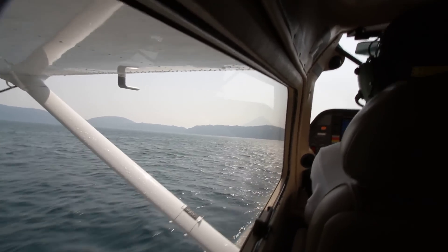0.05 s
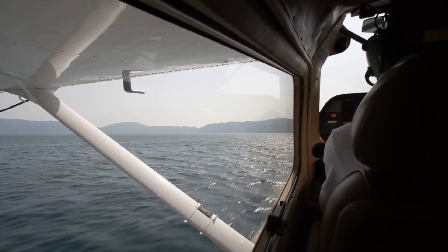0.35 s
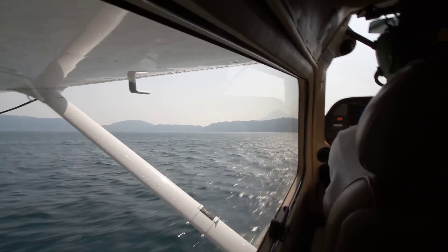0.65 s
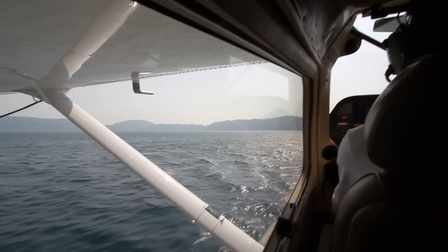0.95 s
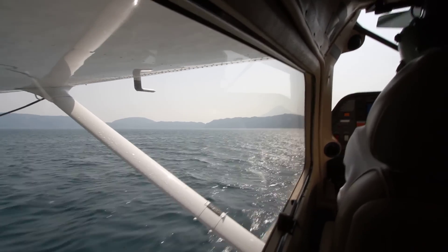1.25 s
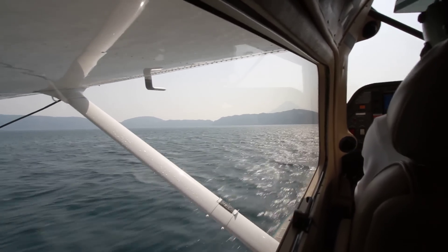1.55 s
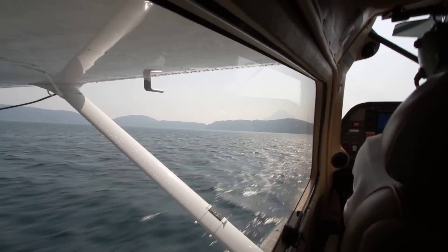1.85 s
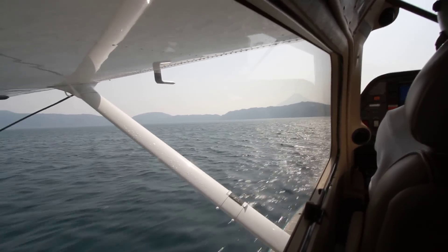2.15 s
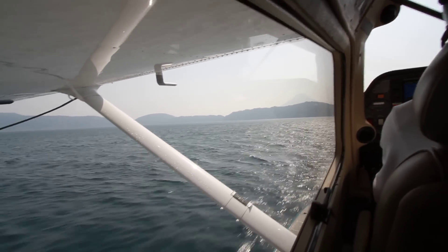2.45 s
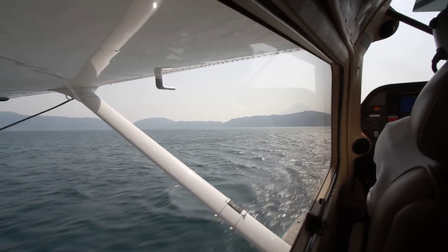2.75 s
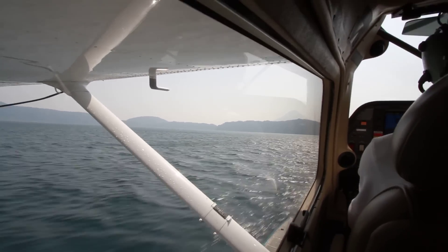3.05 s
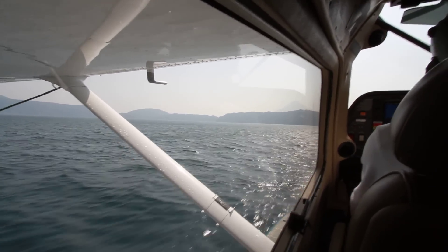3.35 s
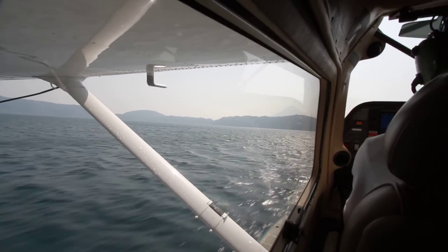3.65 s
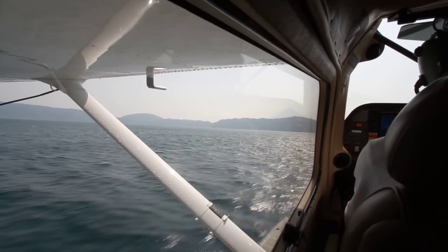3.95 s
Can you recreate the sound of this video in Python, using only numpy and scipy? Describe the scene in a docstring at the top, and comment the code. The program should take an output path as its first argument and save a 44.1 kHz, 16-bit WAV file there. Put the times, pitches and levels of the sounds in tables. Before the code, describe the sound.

Seaplane engine droning in the cabin while choppy water sloshes and sprays the hull.

```python
"""Seaplane cabin on choppy water.

A six-cylinder engine and its propeller drone in harmonics at steady throttle.
Uneven firings shake the cabin and tick in the treble, over a faint rush of air.
Waves knock and slosh on the floats and throw sheets of spray that patter on the hull."""
import sys
import numpy as np
from scipy import signal
from scipy.fft import rfft, irfft
from scipy.io import wavfile
from scipy.ndimage import uniform_filter1d

SR = 44100
rng = np.random.default_rng(int(sys.argv[2]) if len(sys.argv) > 2 else 0)


def persist_wave(psi):
    """Save psi, clipped to +-1, as 16-bit WAV."""
    counts = np.round(np.clip(psi, -1, 1) * 32767).astype(np.int16)
    wavfile.write(sys.argv[1], SR, np.atleast_2d(counts).T)


N = 176400
CYCLE_HZ = 20.626  # one engine cycle: two shaft turns, six firings


def drone(t, cycles):
    """Engine and propeller harmonics locked to the shaft; three swell and sink, the rest waver."""
    # Tone at twice the shaft rate. Each row: time in seconds, level in dB.
    low_levels = [(0, -29.5), (1, -30.5), (1.6, -29.5), (2.5, -29), (3.2, -38), (4, -37)]
    # Each row: time in seconds, relative dB of the firing tone, relative dB of the fifth above it.
    main_levels = [(0.0, -19, -31), (0.05, -29, -18.5), (0.15, -15.5, -31), (0.22, -22, -21.5),
                   (0.77, -21.5, -18.5), (0.89, -23.5, -25), (0.98, -12.5, -21), (1.04, -20, -16),
                   (1.39, -19, -29), (1.51, -18.5, -19.5), (2.0, -15.5, -29), (2.48, -18.5, -18.5),
                   (2.62, -12.5, -31), (2.68, -29, -19), (2.75, -11.5, -30), (2.83, -15.5, -23.5),
                   (3.97, -14, -29), (4.0, -28, -24)]
    # Other harmonics. Each row: multiple of the cycle rate, relative level in dB.
    harmonics = [(2, -45.5), (3, -50), (7, -29), (8, -28.5), (10, -42), (11, -39), (12, -24.5), (15, -31),
                 (16, -38.5), (18, -31.5), (19, -52.5), (22, -37), (23, -45.5), (25, -40), (29, -47.5),
                 (30, -41), (31, -50.5), (60, -55)]

    def tone(order, db):
        return undb(db) * np.sqrt(2) * np.sin(2 * np.pi * (order * cycles + rng.random()))
    times_s, firing_db, fifth_db = np.array(main_levels).T
    low = tone(order=4, db=np.interp(t, *np.array(low_levels).T))
    firing = tone(order=6, db=np.interp(t, times_s, firing_db) - 0.5)
    fifth = tone(order=9, db=np.interp(t, times_s, fifth_db) + 2)
    others = sum(tone(order, db + 1 + 2 * walk(rate_hz=5)) for order, db in harmonics)
    return low + firing + fifth + others


def firings(cycles):
    """A decaying surge per firing, its strength set by cylinder and chance; rms 1."""
    # Each entry: relative level of one cylinder in dB, in firing order.
    cylinder_db = [2, -3, 0, 2.5, 2.5, -12.5]
    decay_s, scatter_db = 0.0049, 2
    count = len(cylinder_db)
    index = np.floor(cycles * count).astype(int)
    age_s = (cycles * count - index) / (count * CYCLE_HZ)
    db = np.array(cylinder_db)[index % count] + scatter_db * rng.standard_normal(N)[index]
    return unit(undb(db) * np.exp(-age_s / decay_s))


def cabin(surge):
    """Firings pulse the rumble and clatter; the cabin air booms at its resonance."""
    # Cabin rumble and engine clatter spectra. Each row: frequency in Hz, relative density in dB.
    rumble_spectrum = [(15, -44), (24, -43), (34, -19), (62, -7), (100, -6.5), (140, -1), (195, 0.5),
                       (250, -1.5), (340, -5), (430, -7.5), (600, -15), (700, -20), (1000, -30.5),
                       (2000, -62)]
    clatter_spectrum = [(300, -3), (600, 5.5), (850, 1), (1160, 1.5), (1500, -6.5), (2100, -10),
                        (2900, -17), (4300, -21), (5700, -24), (8000, -31.5), (11000, -38), (15500, -59)]

    def pulsed(share):
        return rng.standard_normal(N) * np.sqrt(1 - share + share * surge ** 2)
    rumble = undb(-19.5) * colour(pulsed(share=0.41), rumble_spectrum)
    steady_rumble = colour(rng.standard_normal(N), rumble_spectrum)
    boom = undb(-24.5) * resonate(steady_rumble, hz=128.7, width_hz=9.9)
    clatter = undb(-36) * colour(pulsed(share=0.72), clatter_spectrum)
    return rumble + boom + clatter


def spray(t):
    """Each wave on the floats throws heavy drops and fine mist against the hull."""
    # Each row: start in seconds, length in seconds, level in dB, mist in dB relative to that level.
    waves = [(-.02, 0.062, -30.5, -8), (0.125, 0.03, -47, -1), (0.278, 0.032, -30, -14),
             (0.388, 0.13, -37, -13), (0.487, .06, -33.5, -13), (0.676, 0.069, -38, -12),
             (0.932, 0.048, -32.5, -16), (1.842, 0.13, -37.5, -11), (1.914, 0.07, -28, -12),
             (2.67, 0.081, -25.5, -14), (2.754, 0.064, -27, -14), (2.928, .13, -25.5, -9.5),
             (3.047, 0.078, -26, -4.5), (3.115, 0.1, -26.5, -9), (3.208, 0.078, -26.5, -10.5),
             (3.28, 0.026, -26.5, -14.5), (3.385, 0.018, -28.5, -30), (3.469, 0.079, -25.5, -14.5),
             (3.523, 0.071, -27.5, -4.5), (3.586, 0.07, -23, -12.5), (3.739, 0.038, -25, -13.5),
             (3.78, 0.082, -27.5, -17), (3.842, 0.1, -25.5, -13), (3.934, .095, -28, -19)]
    # Heavy drop and fine mist spectra. Each row: frequency in Hz, relative density in dB.
    splash_spectrum = [(250, -2), (450, 1), (610, 10), (690, 2), (760, 5), (880, -1), (1100, 1), (1400, -4),
                       (1650, -2), (2050, -3.5), (2550, -13), (3300, -18), (5000, -41), (8000, -41),
                       (15500, -48)]
    mist_spectrum = [(1000, 0), (2200, 6), (3000, 2.5), (3700, 1.5), (4600, 1.5), (5900, -4.5), (7600, -13),
                     (10000, -14.5), (12500, -25), (15500, -36.5)]
    attack_s, splash_release_s, mist_release_s = 0.032, 0.025, 0.012
    splash_power, mist_power = 0, 0
    for start_s, length_s, db, mist_db in waves:
        rise = np.clip((t - start_s) / attack_s, 0, 1)
        after_s = np.maximum(t - start_s - length_s, 0)
        splash_power += (undb(db) * rise * np.exp(-after_s / splash_release_s)) ** 2
        mist_power += (undb(db + mist_db) * rise * np.exp(-after_s / mist_release_s)) ** 2
    splash = np.sqrt(splash_power) * colour(drops(per_s=3000, spread_db=2), splash_spectrum)
    mist = np.sqrt(mist_power) * colour(drops(per_s=7000, spread_db=4.5), mist_spectrum)
    churn_db = walk(rate_hz=130)
    return (splash + mist) * undb(churn_db)


def slaps(t):
    """Small waves knock dully on the hollow floats."""
    # Each row: start in seconds, relative level in dB.
    knocks = [(0.299, -30), (0.964, -31), (0.99, -21), (1.086, -26), (1.375, -28), (1.471, -26),
              (1.714, -26), (2.205, -22), (2.289, -26), (2.599, -26), (2.684, -23), (3.747, -22)]
    # Each row: frequency in Hz, relative density in dB.
    float_spectrum = [(60, -20.5), (130, -2), (300, 7), (600, -1.5), (1000, -13.5), (2000, -20.5),
                      (4000, -31), (8000, -37), (15500, -54.5)]
    decay_s = 0.006
    force = sum(undb(db) * (t >= start_s) * np.exp(-np.abs(t - start_s) / decay_s)
                for start_s, db in knocks)
    envelope = undb(6.5) * uniform_filter1d(force, size=64)
    return envelope * colour(rng.standard_normal(N), float_spectrum)


def wash(t):
    """Water sloshes along the floats without pause."""
    # Each row: time in seconds, mean level in dB.
    levels = [(0, -36.5), (.2, -39), (.6, -37.5), (.98, -38.5), (1.05, -43), (1.8, -41.5), (2.1, -42.5),
              (2.45, -49), (2.65, -51.5), (2.88, -38.5), (3.4, -46), (3.7, -51), (4, -41)]
    # Each row: frequency in Hz, relative density in dB.
    slosh_spectrum = [(250, -4.5), (450, -8.5), (600, -3), (850, 2.5), (1150, 0.5), (1450, -4),
                      (2000, -8.5), (2600, -17), (4000, -19.5), (5800, -23), (8000, -30.5), (11000, -37.5),
                      (15500, -49)]
    db = np.interp(t, *np.array(levels).T) + 2 * walk(rate_hz=22)
    return undb(db) * colour(drops(per_s=3000, spread_db=3.5), slosh_spectrum)


def airflow():
    """Air rushes faintly past the door."""
    # Each row: frequency in Hz, relative density in dB.
    air_spectrum = [(1000, -0.5), (2500, 0), (4200, 2.5), (5800, -1), (7000, -5.5), (8500, -20.5),
                    (11000, -26.5), (15500, -42.5)]
    return undb(-57) * colour(rng.standard_normal(N), air_spectrum)


def drops(per_s, spread_db):
    """Random impacts of log-normal size and either sign."""
    hits = rng.random(N) < per_s / SR
    return hits * undb(spread_db * rng.standard_normal(N)) * rng.choice([-1, 1], N)


def colour(x, spectrum):
    """Minimum-phase filter through (Hz, dB) points; output rms 1."""
    hz, db = np.array(spectrum, float).T
    bins_hz = np.maximum(np.arange(N // 2 + 1) * SR / N, 1)
    gain = undb(np.interp(np.log(bins_hz), np.log(hz), db))
    cepstrum = irfft(np.log(gain), N)
    response = np.exp(rfft(2 * cepstrum[:N // 2], N))
    return unit(irfft(rfft(x) * response, N))


def resonate(x, hz, width_hz):
    """One resonance; output rms 1."""
    bins_hz = np.maximum(np.arange(N // 2 + 1) * SR / N, 1)
    detuning = hz / width_hz * (bins_hz / hz - hz / bins_hz)
    return unit(irfft(rfft(x) / (1 + 1j * detuning), N))


def walk(rate_hz):
    """Smooth random motion; rms 1."""
    hold = max(int(SR / rate_hz), 2)
    steps = np.repeat(rng.standard_normal(2048), hold)[:N]
    return unit(uniform_filter1d(uniform_filter1d(steps, hold), hold))


def undb(db):
    """Decibels to gain."""
    return 10 ** (np.asarray(db) / 20)


def unit(x):
    """Scale to rms 1."""
    return x / np.sqrt(np.mean(x ** 2))


def scene():
    """Engine, cabin and water at the passenger's seat, in mono."""
    t = np.arange(N) / SR
    speed_ratio = 1 + 0.0007 * walk(rate_hz=2) + 0.002 * walk(rate_hz=40)  # wander and flutter
    cycles = np.cumsum(CYCLE_HZ * speed_ratio) / SR
    plane = drone(t, cycles) + cabin(firings(cycles)) + airflow()
    water = wash(t) + spray(t) + slaps(t)
    return (plane + water)[None]


def record(dry):
    """The microphone cuts the top treble."""
    cutoff_hz = 15750
    return signal.sosfilt(signal.ellip(10, .2, 80, cutoff_hz, fs=SR, output="sos"), dry)


dry = scene()
out = record(dry)
persist_wave(out)
```